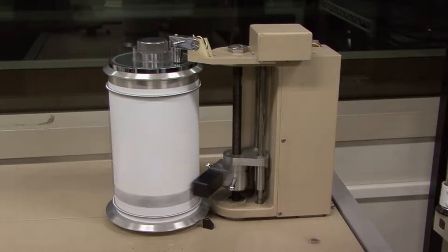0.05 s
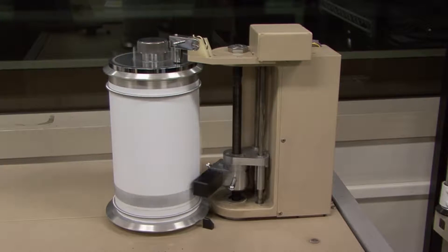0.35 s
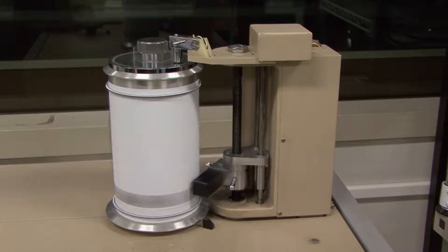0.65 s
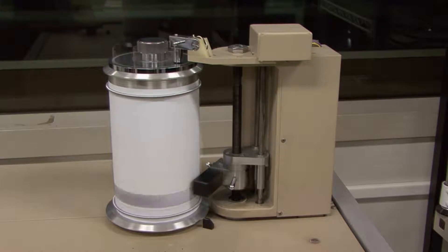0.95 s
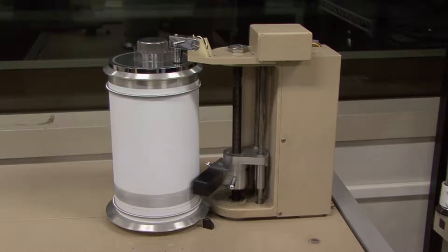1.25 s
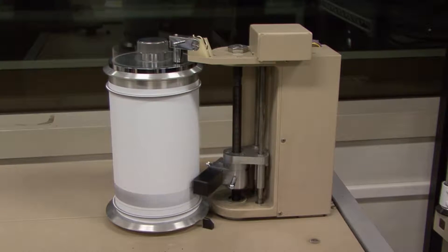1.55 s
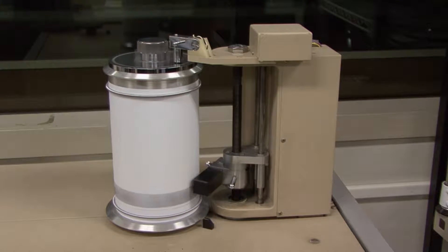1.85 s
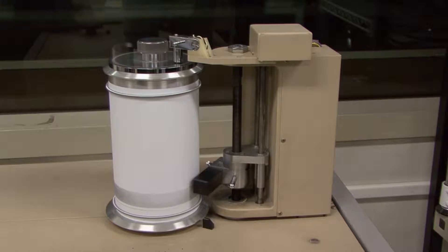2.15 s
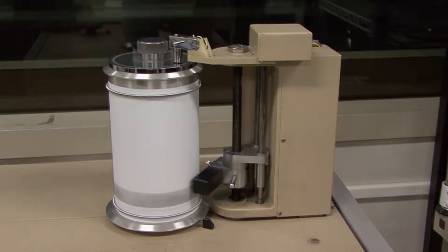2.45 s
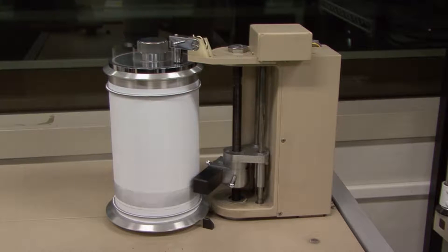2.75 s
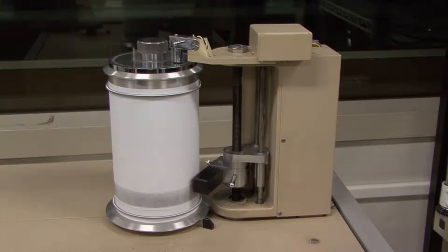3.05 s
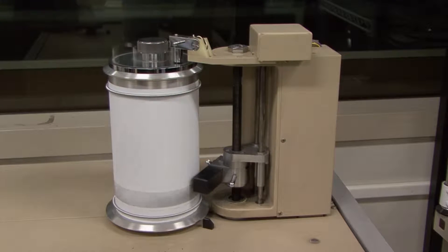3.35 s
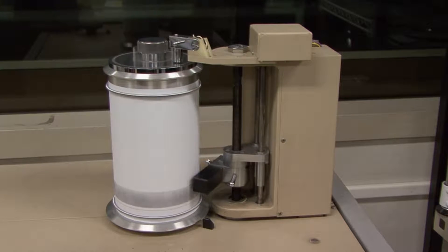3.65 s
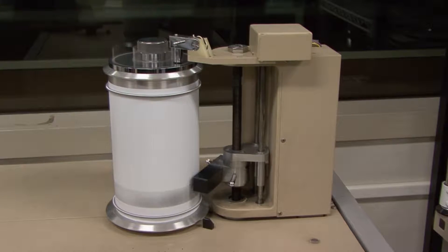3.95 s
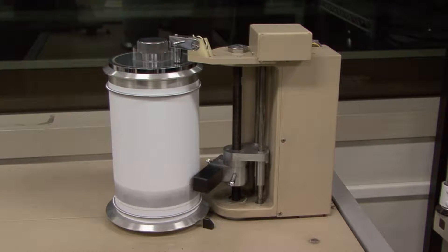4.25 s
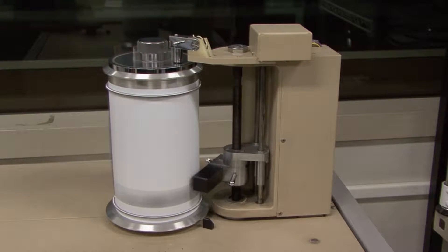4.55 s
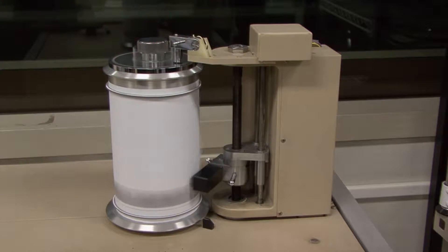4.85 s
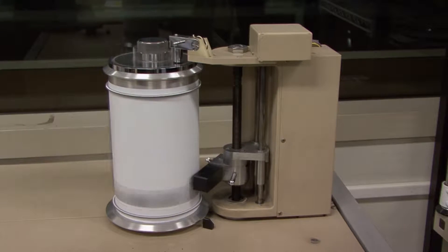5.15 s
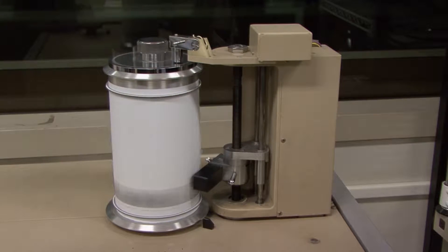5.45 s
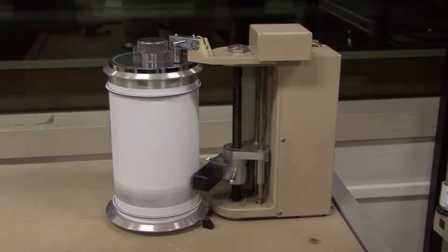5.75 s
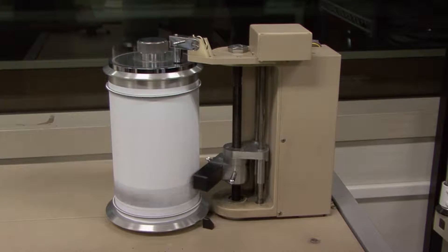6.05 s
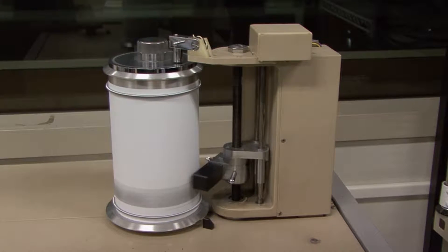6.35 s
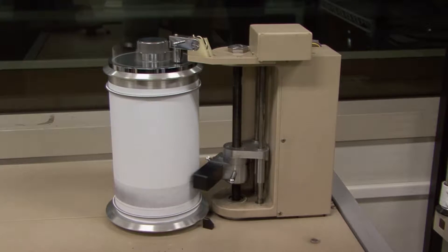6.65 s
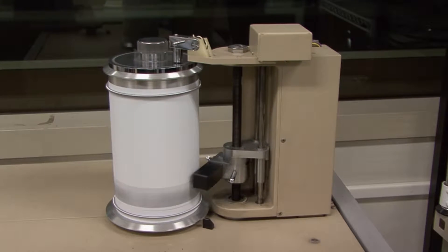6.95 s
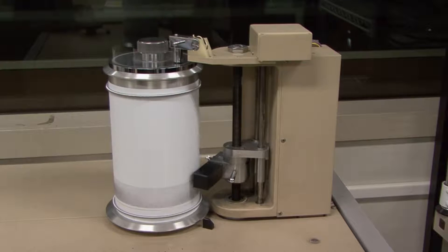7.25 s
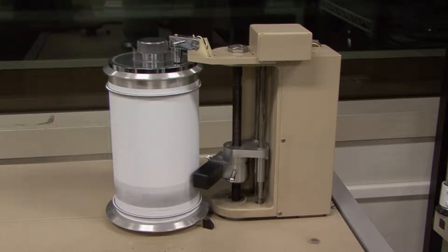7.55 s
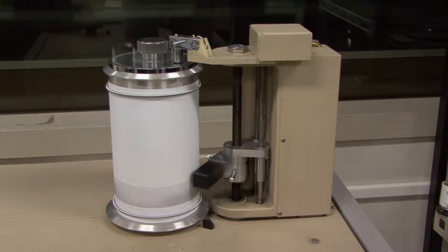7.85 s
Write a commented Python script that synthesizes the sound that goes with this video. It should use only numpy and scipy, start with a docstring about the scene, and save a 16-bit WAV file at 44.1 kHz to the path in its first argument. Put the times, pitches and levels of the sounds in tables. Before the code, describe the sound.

Crisp, evenly spaced ticks and a thin papery hiss from a stylus on a rotating drum, over a steady electric whir.

```python
"""An old sound spectrograph at work

On a laboratory bench a motor hums and its drive whines, spinning a paper-covered drum.
A stylus (a fine needle) hisses and sings along the paper. Five times a second it scrapes up
the overlap of the sheet, snaps off its edge and lands with a small knock on the hollow drum."""
import sys
import numpy as np
from scipy import signal
from scipy.fft import rfft, irfft, next_fast_len
from scipy.io import wavfile
from scipy.ndimage import map_coordinates

SR = 44100
rng = np.random.default_rng(int(sys.argv[2]) if len(sys.argv) > 2 else 0)


def file_out(sig):
    """Save sig as 16-bit WAV at sys.argv[1]."""
    # one column per channel
    cols = np.atleast_2d(sig).T
    # limit, then scale
    lim = np.clip(cols, -1, 1)
    pcm = np.round(lim * 32767).astype(np.int16)
    wavfile.write(sys.argv[1], SR, pcm)


N = 357636
TIME = np.arange(N) / SR
# The drum turns steadily, and the stylus drops off the paper's edge once a turn.
FIRST_EDGE_S, TURN_S = .0108, .196366


def amp(db):
    """Turn decibels into a number to multiply a sound by."""
    return 10 ** (np.asarray(db) / 20)


def unit(x):
    """Scale a sound to an average (rms) level of 1."""
    return x / np.sqrt(np.mean(x ** 2) + 1e-20)


def along(points, hz):
    """Read between (Hz, value) points, giving each octave equal room."""
    point_hz, values = np.transpose(points)
    return np.interp(np.log(hz + 1), np.log(point_hz + 1), values)


def wobble(rate):
    """A smooth random curve through `rate` new values a second."""
    return map_coordinates(rng.standard_normal(int(N * rate / SR) + 4), [TIME * rate])


def filtered(x, response):
    """Multiply each frequency in a sound by response(hz)."""
    size = next_fast_len(N + SR // 2)
    hz = np.fft.rfftfreq(size, 1 / SR)
    return irfft(rfft(x, size) * response(hz), size)[..., :N]


def humps(resonances, hz):
    """The boost in dB around resonances, the pitches at which a part likes to ring."""
    return sum(db * np.exp(-((hz - centre) / width) ** 2) for centre, width, db in resonances)


def rush(density_db):
    """Stereo noise whose shared middle part has density_db(hz) decibels per Hz."""
    # How alike the two ears are. Each row: frequency in Hz, likeness (1 means the same).
    likeness = [(60, 0.95), (130, 0.97), (290, 0.72), (640, 0.67), (1410, 0.5), (3100, 0.7), (5600, 1),
                (8300, 0.81), (10000, 0.94), (12300, 1), (14700, 0.78)]
    side_gain = lambda hz: np.tan(np.arccos(np.clip(along(likeness, hz), -1, 1)) / 2)
    white = rng.standard_normal((2, N)) * np.sqrt(SR / 2)
    mid, side = filtered(white, lambda hz: amp(density_db(hz)) * [np.ones_like(hz), side_gain(hz)])
    return np.array([mid + side, mid - side])


def impulse(spectrum, vary_db, size=256):
    """The shortest click of a given tone colour, different each time, with energy 1."""
    hz = np.fft.rfftfreq(size, 1 / SR)
    chance = map_coordinates(rng.standard_normal(size=12), [hz / 2000])
    cepstrum = irfft(np.log(amp(along(spectrum, hz) + vary_db * chance)))
    # Folding the late half onto the early half packs the energy at the click's start.
    cepstrum[1:size // 2] *= 2
    cepstrum[size // 2 + 1:] = 0
    click = irfft(np.exp(rfft(cepstrum)))
    return click / np.linalg.norm(click)


def ring(modes, vary_db):
    """The fading tones (modes) of a struck part; neighbours swing in opposite directions."""
    t = TIME[:SR // 4]
    fade = lambda db, t60: amp(db + vary_db * rng.normal() - 60 * t / t60)
    return sum((-1) ** k * fade(db, t60) * np.cos(2 * np.pi * hz * t)
               for k, (hz, db, t60) in enumerate(modes))


def add(track, s, sound):
    """Mix a sound into a track, starting at s seconds."""
    part = track[max(round(s * SR), 0):][:len(sound)]
    part += sound[:len(part)]


def tone(hz, db, drift, spread, scatter=1):
    """A stereo tone: drift shifts its wave, and the room sets the ears out of step by spread."""
    phase = 2 * np.pi * (hz * TIME + scatter * rng.random()) + drift
    apart = spread * rng.choice([-1, 1])
    ear_phases = phase % (2 * np.pi) + np.array([[apart], [-apart]])
    return np.sqrt(2) * amp(db) * np.sin(np.float32(ear_phases))


def flare_db(hz, half_length_s=0.19, reach_hz=110):
    """The change in dB over time as a tone at hz briefly flares up or dips."""
    # Each row: time of the peak in seconds, pitch in Hz, change in dB.
    flares = [(1.3, 1624, 3), (2.5, 1624, 2.5), (3.62, 4792, 4), (3.65, 1804, 3.5), (4.53, 559, 2.5),
              (4.6, 4792, 2), (5.22, 1624, 6), (5.22, 1804, 4), (6.03, 4792, 4), (6.05, 1970, 5),
              (6.2, 1624, -6), (7.8, 1263, 4)]
    return sum(db * np.exp(-((TIME - s) / half_length_s) ** 2 - ((hz - centre) / reach_hz) ** 2)
               for s, centre, db in flares)


def room(x):
    """The room's soft echo in each ear; the treble dies first."""
    # Each row: frequency in Hz, seconds to fade by 60 dB.
    fade_times = [(200, 0.36), (4000, 0.15), (15000, 0.084)]
    hz, t, noise = signal.stft(rng.standard_normal((2, SR // 2)), SR, nperseg=256)
    fade = amp(-60 * t / along(fade_times, hz)[:, None])
    tail = signal.istft(noise * fade, SR, nperseg=256)[1]
    return signal.fftconvolve(x, tail / np.linalg.norm(tail[0]), axes=1)[:, :N]


def whir(flutter_db=1.0, edge_hz=4100):
    """Noise from bearings and air, coloured by the housing."""
    # The bare noise. Each row: frequency in Hz, level in dB per Hz.
    air = [(20, -96), (42, -74.5), (75, -83), (200, -78.5), (350, -80.5), (750, -84), (1500, -83.5),
           (2600, -80.5), (3500, -82.5), (4100, -91)]
    # The housing's resonances. Each row: pitch in Hz, width in Hz, boost in dB.
    housing = [(505, 89, 5.1), (1104, 63, 7.1), (1625, 94, 3.6), (2310, 150, 2.3), (2720, 16, 5.5),
               (3450, 28, 6.2)]
    roll_off = lambda hz: 10 * np.log10(1 + (hz / edge_hz) ** 20)
    flutter = amp(flutter_db * wobble(14))
    return flutter * rush(lambda hz: along(air, hz) + humps(housing, hz) - roll_off(hz))


def hum(lag, shaft_hz=18.404, waver_db=1.5):
    """The motor hums at multiples of its shaft rate; partly in step, they flutter once a revolution."""
    # Each row: multiple of the shaft rate, level in dB.
    harmonics = [(7, -66), (8, -70), (9, -63), (11, -58), (12, -65), (13, -61), (14, -60.5), (15, -65.5),
                 (16, -64.5), (18, -66), (20, -64.5), (21, -70.5), (22, -65), (24, -59.5), (26, -66),
                 (27, -63.5), (29, -62.5), (34, -64.5), (38, -65)]
    return sum(tone(k * shaft_hz, db + waver_db * wobble(4), k * shaft_hz * lag,
                    spread=0.13, scatter=0.74) for k, db in harmonics)


def whine(lag, level_db=-1, waver_db=2.5, rattle=0.16):
    """The drive whines; looseness in it roughens each tone on its own."""
    # Each row: pitch in Hz, relative level in dB.
    tones = [(1444, -66.5), (1593, -62.5), (1965, -66), (2165, -67), (2246, -64.5), (2274, -62.5),
             (2297, -57.5), (2327, -63), (2365, -66), (2419, -57.5), (2644, -61.5), (2725, -62),
             (2867, -66), (2905, -66.5), (4352, -68), (8136, -66), (8483, -59.5)]
    return sum(tone(hz, db + level_db + waver_db * wobble(6), hz * lag + rattle * wobble(25),
                    spread=0.11) for hz, db in tones)


def swells(lag, waver_db=.7):
    """Four drive tones swell and fade (beat) as close pitches drift into and out of step with them."""
    # One entry per tone: its pitch in Hz, and its level in dB before beating.
    pitches = [558.6, 1263.1, 1623.4, 1803.7]
    levels = [-57.5, -62.2, -59.3, -60.5]
    # One list of neighbours per tone. Each row: distance in Hz, level against the tone in dB,
    # a time in seconds when the two are in step.
    beats = [
        [(1.456, -1, 0.55), (1.621, -3, .07), (2.039, -3.9, 0.17)],
        [(-.376, -7.5, 2.06), (.924, -9.5, 0.24)],
        [(-0.244, -6, 1.7), (-1.728, -8, 0.13)],
        [(0.512, -8.5, 1.44), (.267, -8, .41)],
    ]
    sound = np.zeros((2, N))
    for hz, db, neighbours in zip(pitches, levels, beats):
        beat = 1 + sum(amp(near_db) * np.exp(2j * np.pi * apart_hz * (TIME - crest_s))
                       for apart_hz, near_db, crest_s in neighbours)
        level_db = db + flare_db(hz) + waver_db * wobble(8)
        sound += abs(beat) * tone(hz, level_db, hz * lag + np.angle(beat), spread=0.2)
    return sound


def motor(slip=0.00034):
    """The motor and its drive all follow the same slight unsteadiness of speed."""
    lag = slip * wobble(3)
    return hum(lag) + whine(lag) + swells(lag)


def bumps(rise_s=0.0026):
    """Now and then the frame gives a soft, low bump."""
    # The frame's tones. Each row: pitch in Hz, relative level in dB, seconds to fade by 60 dB.
    frame = [(112, -8, .1), (150, -7, .08), (201, 0, .1), (490, -1, .05)]
    # The bumps. Each row: start in seconds, level in dB.
    moments = [(0.511, -36.5), (1.669, -38), (6.745, -35)]
    thud = ring(frame, vary_db=0)
    thud *= 1 - np.exp(-TIME[:len(thud)] / rise_s)
    track = np.zeros(N)
    for s, db in moments:
        add(track, s, amp(db) * thud)
    return np.array([track, track])


def singing(waver_db=1.0):
    """Friction keeps three tones of the stylus ringing, louder as it climbs the drum."""
    # Each row: pitch in Hz, width in Hz, starting level in dB, growth in dB per second.
    modes = [(1968, 29, -59, 0.41), (3148, 15, -62, .9), (4790, 14, -56.5, .7)]
    sound = np.zeros((2, N))
    for centre, width, db, growth in modes:
        level_db = db + growth * TIME + flare_db(centre) + waver_db * wobble(3.04)
        narrow_noise = rush(lambda hz: -20 * np.log10(1 + ((hz - centre) / (2 * width)) ** 2))
        sound += amp(level_db) * unit(narrow_noise)
    return sound


def rubbing(hiss_db=-0.6, grain_db=1, growth_db_per_s=.27):
    """The paper's grain shakes the stylus arm into a hiss that grows as the stylus climbs."""
    # The paper's hiss. Each row: frequency in Hz, relative level in dB per Hz.
    paper = [(2500, -115), (4000, -89), (5200, -85), (6200, -85.5), (8000, -81), (10000, -81), (11700, -85),
             (13400, -88.2), (15500, -87.5), (16300, -120)]
    # The arm's resonances. Each row: pitch in Hz, width in Hz, boost in dB.
    arm = [(4488, 75, 4), (7646, 490, 5.5), (8478, 60, 4.3), (9184, 102, 6.4), (10484, 83, 5.6),
           (11098, 286, 5.8), (12330, 321, 10.3), (14559, 270, 5), (15027, 252, 5.5)]
    # Rough and smooth stretches pass every turn. Each row: seconds after the edge, change in dB.
    sheet = [(0, 0), (.025, 0.4), (.047, 1), (.057, -2), (.068, 2.5), (0.073, -0.9), (.12, 0), (.16, -1.15),
             (.196, 0)]
    hiss = rush(lambda hz: along(paper, hz) + humps(arm, hz))
    sheet_db = np.interp((TIME - FIRST_EDGE_S) % TURN_S, *np.transpose(sheet))
    return hiss * amp(hiss_db + growth_db_per_s * TIME + sheet_db + grain_db * wobble(250))


def seam(lead_s=0.0162, scrape_db=-2, snap_db=0.64, knock_db=1.0, rebound_s=.0023, rebound_db=-18,
         shiver_db=-29, shiver_fade_s=0.033, growth_db_per_s=0.26, scatter_db=.5):
    """Each turn the stylus scrapes up the overlap, snaps off its edge, knocks the drum and rebounds."""
    # The scrape's course. Each row: seconds after meeting the overlap, relative level in dB.
    overlap = [(0, -37), (.003, -40), (.0055, -37), (.007, -33.5), (.0105, -38), (.013, -37.5),
               (0.014, -33.5), (.018, -53)]
    # Tone colours of the scrape and the snap. Each row: frequency in Hz, relative level in dB.
    scrape_colour = [(1500, -22), (3800, -15), (5000, -4), (7000, -3), (9000, 0), (11000, -3), (13000, -10),
                     (15500, -11), (16500, -35)]
    snap_colour = [(300, -30), (1500, -22), (3700, -28), (4500, -13.5), (5200, -7), (7200, -9.5), (9400, 0),
                   (11000, -2.5), (12000, -8), (13000, -15.5), (14000, -14.5), (16000, -26), (17000, -34)]
    # The hollow drum's tones. Each row: pitch in Hz, relative level in dB, seconds to fade by 60 dB.
    drum = [(442.4, -36.5, 0.046), (590, -32, 0.013), (770, -33.5, 0.0081), (1077, -40.5, 0.028),
            (1280, -42, 0.036), (1710, -38.5, 0.0087), (3264, -35, 0.012)]
    clicks, friction = np.zeros((2, N))
    t = TIME[:SR // 10]
    when, level = np.transpose(overlap)
    scrape = amp(scrape_db + np.interp(t, when, level)) * (t < when[-1])
    shiver = amp(shiver_db - 60 * t / shiver_fade_s)  # the sheet's loose edge, after the snap
    for edge_s in np.arange(FIRST_EDGE_S, N / SR, TURN_S):
        # Ticks grow as the stylus climbs, and no two are quite alike.
        db = growth_db_per_s * edge_s + scatter_db * rng.normal()
        add(friction, edge_s - lead_s, amp(db) * scrape)
        add(clicks, edge_s, amp(db + snap_db) * impulse(snap_colour, vary_db=0.24))
        add(friction, edge_s, amp(db) * shiver)
        bounce_s = edge_s + rebound_s * (1 + 0.076 * rng.normal())
        bounce = amp(db + rebound_db + 2 * rng.normal()) * impulse(scrape_colour, vary_db=8.0)
        add(clicks, bounce_s, bounce)
        add(clicks, (edge_s + bounce_s) / 2, amp(db + knock_db) * ring(drum, vary_db=1.16))
    return clicks + friction * unit(rush(lambda hz: along(scrape_colour, hz)))


def scene(room_db=-23, ear_lag_s=2.5e-6):
    """The machine stands close by and a little to the left, so that side hears it first and louder."""
    # Each row: frequency in Hz, how much louder the left is than the right in dB.
    lean = [(60, 1), (250, 2), (600, 2.5), (1500, 1.3), (3000, 1.6), (6000, 0.2), (14000, 0.8)]
    ticks = seam()
    machine = ticks + amp(room_db) * room(ticks) + motor() + whir() + rubbing() + singing() + bumps()
    ears = np.array([[.5], [-.5]])
    time_shift = lambda hz: np.exp(2j * np.pi * hz * ears * ear_lag_s)
    return filtered(machine, lambda hz: amp(ears * along(lean, hz)) * time_shift(hz))


def record(dry):
    """Cut away the very highest treble."""
    return filtered(dry, lambda hz: hz < 16950)


dry = scene()
out = record(dry)
file_out(out)
```